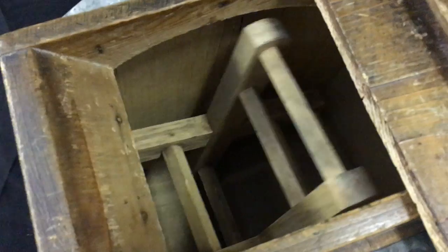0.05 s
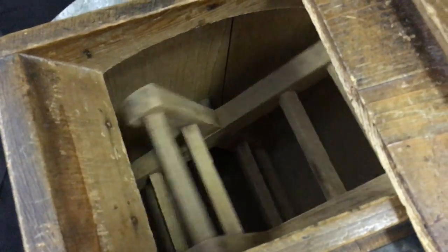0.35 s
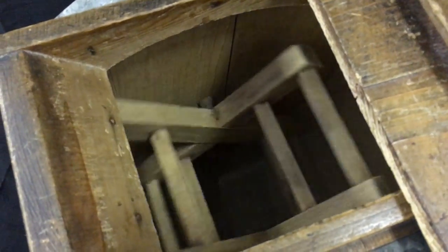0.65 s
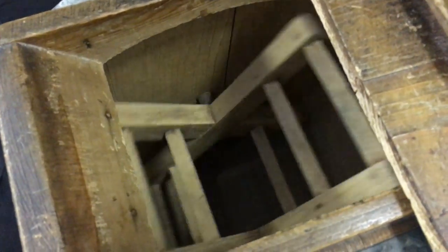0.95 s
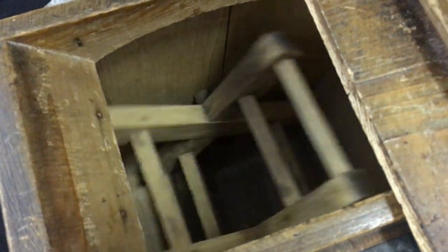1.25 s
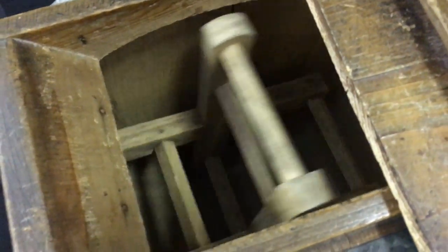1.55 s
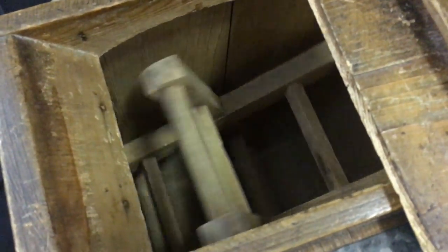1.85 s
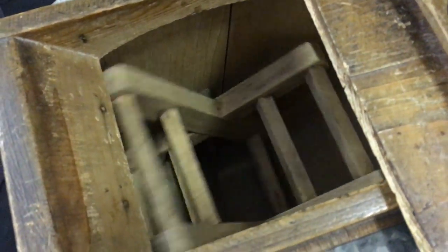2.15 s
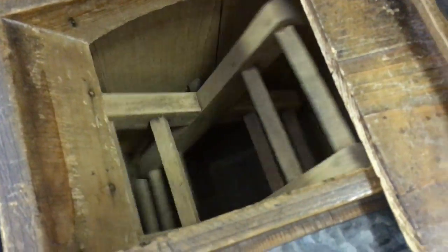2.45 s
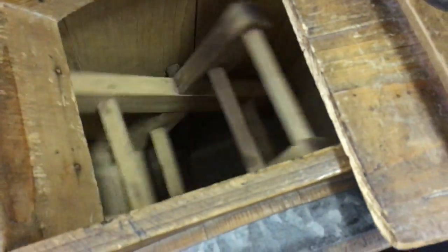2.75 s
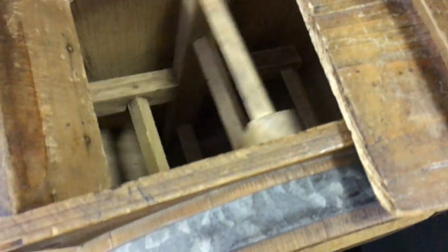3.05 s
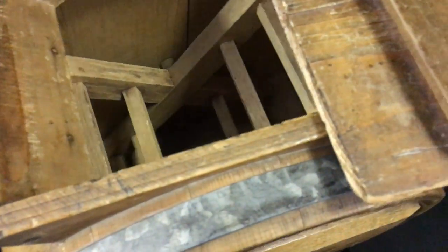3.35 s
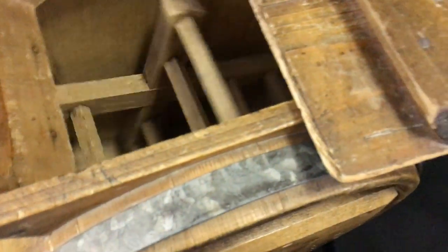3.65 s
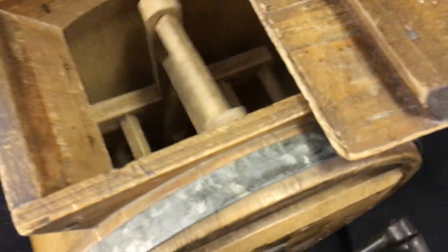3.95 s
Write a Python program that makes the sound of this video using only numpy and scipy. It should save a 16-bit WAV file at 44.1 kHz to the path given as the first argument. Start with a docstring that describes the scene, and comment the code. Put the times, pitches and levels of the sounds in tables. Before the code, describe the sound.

An empty wooden butter churn turns close by in a room, with a steady hollow rumble and faint axle rubbing. A dull knock comes first, then two sharp clacks, scattered lighter knocks and one last clack.

```python
"""The slatted dasher of an empty wooden butter churn, cranked round close by in a room.
Three wooden parts clack once each, two with a rebound. The loose axle knocks dully against the
barrel and rubs in its bearing. The dragging dasher sets the barrel humming; dry wood brushes and
squeaks faintly. A steady hollow rumble and room hiss lie underneath."""
import sys
import numpy as np
from scipy import signal
from scipy.fft import rfft, irfft
from scipy.io import wavfile
from scipy.ndimage import uniform_filter1d

SR = 44100
rng = np.random.default_rng(int(sys.argv[2]) if len(sys.argv) > 2 else 0)


def master(y):
    """Save y as 16-bit WAV."""
    cut = np.clip(np.atleast_2d(y).T, -1, 1)
    pcm = np.round(cut * 32767)  # scale
    wavfile.write(sys.argv[1], SR, pcm.astype(np.int16))


N = 176400
TIME_S = np.arange(N) / SR
STRIKE_S = TIME_S[:SR // 2]
FREQ_HZ = np.arange(N // 2 + 1) * SR / N
TOP_HZ = 15600


def undb(db):
    """Decibels to gain."""
    return 10 ** (np.asarray(db) / 20)


def unit_rms(x):
    """Scale to rms 1."""
    return x / np.sqrt(np.mean(x ** 2))


def decay(t60_s):
    """Exponential decay after a strike, 60 dB in t60_s."""
    return np.exp(-np.minimum(np.log(1000) * STRIKE_S / t60_s, 50))


def swell(middle_s, length_s):
    """Gaussian rise and fall."""
    return np.exp(-2 * ((TIME_S - middle_s) / length_s) ** 2)


def wander(rate_hz):
    """Smooth random drift, rms 1."""
    hold = int(SR / rate_hz)
    steps = rng.standard_normal(4000)[np.arange(N) // hold]
    return unit_rms(uniform_filter1d(uniform_filter1d(steps, hold), hold))


def noise(spectrum):
    """Noise shaped by (Hz, dB) points, 24 dB/octave skirts, rms 1."""
    hz, db = np.array(spectrum, float).T
    f = np.maximum(FREQ_HZ, 1)
    skirts = np.minimum(f / hz[0], 1) ** 4 * np.minimum(hz[-1] / f, 1) ** 4
    shape = undb(np.interp(np.log(f), np.log(hz), db))
    return unit_rms(irfft(rfft(rng.standard_normal(N)) * skirts * shape, N))


def ring(modes, rise_at_1khz_s=0.003):
    """Struck wood: modes build as the blow spreads, low ones slowest, then decay."""
    out = 0
    for hz, db, t60_s in modes:
        rise = 1 - np.exp(-STRIKE_S * np.sqrt(hz / 1000) / rise_at_1khz_s)
        tone = np.sin(2 * np.pi * (hz * STRIKE_S + rng.random()))
        out += undb(db) * rise * tone * decay(t60_s)
    return out


def add(out, start_s, sound):
    """Mix a sound in at start_s."""
    i = int(start_s * SR)
    out[i:i + len(sound)] += sound[:N - i]


# Each row: frequency in Hz, relative density in dB.
AIR_SPECTRUM = [(240, -33), (400, 0), (560, -.5), (1050, -3), (1340, -8.5), (1750, -10.5), (2950, -20),
                (3450, -19), (4840, -29.5), (6700, -33), (7900, -36), (9700, -38), (10400, -43),
                (11200, -38.5), (15500, -43)]


def air(level_db=-52):
    """Smooth room hiss."""
    return undb(level_db) * noise(AIR_SPECTRUM)


# Each row: centre in Hz, width in Hz, relative density in dB.
RUMBLE_RESONANCES = [(43.3, 16, -21), (60.2, 13.8, -0.5), (77.6, 16.4, -6.5), (94, 77, -12),
                     (118.6, 24.6, 0), (141.3, 34, -4), (161.9, 11.6, -3), (185.6, 29.4, -11.5),
                     (229.7, 20.7, -12), (261.5, 15.4, -9), (301, 17, -16), (327.6, 31, -18),
                     (364.6, 39, -14), (391, 42, -23.5)]


def rumble(level_db=-34.5, sway_db=1.5, low_cut_hz=36):
    """Random low shaking through hollow resonances, swaying slightly in level."""
    power = sum(undb(db) ** 2 / (1 + ((FREQ_HZ - hz) / (0.45 * width_hz)) ** 2) ** 2
                for hz, width_hz, db in RUMBLE_RESONANCES)
    shaking = np.exp(2j * np.pi * rng.random(len(FREQ_HZ)))
    low_cut = 1 / np.sqrt(1 + (low_cut_hz / np.maximum(FREQ_HZ, 1)) ** 8)
    hollow = unit_rms(irfft(np.sqrt(power) * low_cut * shaking, N))
    return undb(level_db + sway_db * wander(8.89)) * hollow


# Each row: time in seconds, level in dB.
RUB_LEVELS = [(0, -62), (.21, -59.5), (.29, -58.5), (.5, -55.5), (.62, -58), (.82, -60.5), (1.15, -58),
              (1.38, -54.5), (1.6, -60), (1.82, -56), (2.24, -60), (2.41, -58.5), (2.52, -60.5),
              (2.66, -55.5), (2.8, -55.5), (3.1, -64), (3.45, -62.5), (3.72, -55), (4, -59.5)]
# Each row: frequency in Hz, relative density in dB.
RUB_SPECTRUM = [(400, 7.5), (1000, 5), (1600, -1), (3600, -8.5), (6500, -13.5), (8000, -22.5),
                (9500, -21.5), (10400, -27.5), (11500, -24), (15000, -29)]


def bearing(band_hz=400, band_sway_db=2.4, uneven_db=2.33):
    """Axle friction comes and goes; narrow bands take turns as the contact shifts."""
    friction, rub = rfft(noise(RUB_SPECTRUM)), 0
    for hz in np.arange(band_hz, TOP_HZ, band_hz):
        triangle = np.maximum(1 - abs(FREQ_HZ - hz) / band_hz, 0)
        rub += irfft(friction * triangle, N) * undb(band_sway_db * wander(26))
    level_db = np.interp(TIME_S, *np.array(RUB_LEVELS).T)
    return unit_rms(rub) * undb(level_db + uneven_db * wander(21.87))


# Each row: middle in seconds, length in seconds, level in dB, centre in Hz, half-width in Hz.
BRUSH_STROKES = [(0.37, 0.026, -66, 8000, 5000), (0.49, 0.024, -64, 4000, 3000),
                 (0.488, 0.017, -72, 12800, 1000), (0.63, 0.16, -75, 13600, 1200),
                 (1.795, 0.025, -69, 6000, 4500), (1.933, 0.034, -71, 9800, 2500),
                 (2.063, 0.025, -74, 12300, 2000), (2.05, .17, -80, 14000, 1800),
                 (2.308, 0.012, -68, 6300, 3500), (3.816, 0.36, -80, 14000, 2200),
                 (3.968, 0.02, -59.5, 3520, 1100)]


def brushes(flicker_db=2.0):
    """Wood brushes on wood: faint high swishes, each in its own broad band."""
    hiss, out = rfft(rng.standard_normal(N)), 0
    for middle_s, length_s, db, hz, half_width_hz in BRUSH_STROKES:
        band = irfft(hiss / (1 + ((FREQ_HZ - hz) / half_width_hz) ** 2), N)
        out += undb(db) * swell(middle_s, length_s) * unit_rms(band)
    return out * undb(flicker_db * wander(60))


# Each row: middle in seconds, length in seconds, level in dB, pitch in Hz, glide in Hz per second.
WOOD_SQUEAKS = [(.51, .06, -74, 6700, 0), (1.29, .025, -70, 6750, 0), (1.435, .04, -73, 5950, -5000),
                (3.96, .11, -78, 11200, 5000)]


def squeaks(waver_hz=170, flicker_db=2.0):
    """Dry wood catches briefly: a thin, unsteady whistle."""
    detune_hz, out = waver_hz * wander(540), 0
    for middle_s, length_s, db, hz, glide_hz_per_s in WOOD_SQUEAKS:
        pitch_hz = hz + glide_hz_per_s * np.clip(TIME_S - middle_s, -length_s, length_s) + detune_hz
        whistle = np.sqrt(2) * np.sin(2 * np.pi * np.cumsum(pitch_hz) / SR)
        out += undb(db) * swell(middle_s, length_s) * whistle
    return out * undb(flicker_db * wander(120))


# Shared by drags and knocks. Each row: frequency in Hz, relative level in dB, T60 in seconds.
BARREL_MODES = [(196, -5, .12), (285, -11, .09), (548, -8, .08), (592, -1, .11), (657, 0, .08),
                (748, -8, .06), (1055, -7, .055), (1150, -8, .045), (1437, -10, .055)]
# Each row: middle in seconds, length in seconds, level in dB.
DASHER_DRAGS = [(0.185, 0.18, -50.5), (1.423, 0.027, -51), (1.497, 0.018, -42.5)]


def drags():
    """The dasher drags briefly; friction sets the barrel humming."""
    hum = unit_rms(signal.fftconvolve(rng.standard_normal(N), ring(BARREL_MODES))[:N])
    return hum * sum(undb(db) * swell(middle_s, length_s) for middle_s, length_s, db in DASHER_DRAGS)


# Contact noise. Each row: frequency in Hz, relative density in dB.
KNOCK_SPECTRUM = [(200, -33), (700, 4), (1400, -3.5), (2500, -12.5), (4000, -22), (7000, -42), (15000, -50)]
# Each row: start in seconds, gain in dB, contact time in ms.
AXLE_KNOCKS = [(.195, -15, 6.4), (.845, -35.5, 0.59), (1.073, -17, 3.6), (1.302, -36.5, 0.17),
               (1.309, -32.5, 0.44), (1.370, -39, 0.4), (1.407, -33, 0.53), (1.429, -33, 0.59),
               (1.464, -29.5, 0.47), (1.478, -42.5, 0.25), (1.494, -36.5, 0.41), (1.644, -38, 0.16),
               (2.4425, -41, 0.28), (2.899, -32, 0.46), (2.9435, -28, 0.064), (2.9468, -25, 0.65),
               (2.9650, -27.5, 0.52)]


def knocks(grit_db=-4.5, grit_t60_s=0.078):
    """The loose axle bumps the barrel; longer contact, duller knock."""
    out, grit = np.zeros(N), noise(KNOCK_SPECTRUM)
    for start_s, db, contact_ms in AXLE_KNOCKS:
        blow = ring(BARREL_MODES)
        blow += undb(grit_db) * np.roll(grit, rng.integers(N))[:len(STRIKE_S)] * decay(grit_t60_s)
        cutoff_hz = 1000 / (2 * contact_ms)
        pole = np.exp(-2 * np.pi * cutoff_hz / SR)
        dulled = signal.lfilter([(1 - pole) ** 2], [1, -2 * pole, pole ** 2], blow)
        add(out, start_s, undb(db) * dulled)
    return out


# Modes of each part. Each row: frequency in Hz, relative level in dB, T60 in seconds.
SLAT = [(290, -9, .09), (673, -6, .09), (780, -11, .05), (1115, 0, .055), (1341, -1, .052),
        (1478, -4, .055), (2119, -15, .06), (2529, -9, .04), (2720, -12, .045), (3194, -16, .055),
        (4040, -8, .04), (4500, -16, .05)]
FRAME = [(161, 0, .19), (220, 1, .07), (284, -2, .06), (694, -14, .075), (922, -10, .07), (1034, -13, .05),
         (1608, -16, .045), (1911, -15, .037), (2235, -14, .035)]
PEG = [(580, -12, .05), (720, -11, .04), (2178, 0, .064), (2275, -4, .05), (2625, -1, .04),
       (4382, -18, .058), (5160, -11, .022)]
# Contact noise of each part. Each row: frequency in Hz, relative density in dB.
SLAT_NOISE = [(300, 1), (1200, 7), (2000, -6), (4500, -5.5), (6500, -11.5), (7800, -21), (11500, -24),
              (14000, -46)]
FRAME_NOISE = [(300, 4.5), (1000, 7), (2200, -3), (2800, -2), (6000, -9.5), (8500, -18), (12000, -32),
               (14500, -39)]
PEG_NOISE = [(300, -16), (700, 4), (2600, 13), (3600, -2.5), (6500, -12.5), (9000, -32), (15000, -33)]
# Hits and rebounds. Each row: start in seconds, modes, ring gain in dB, noise spectrum,
# noise gain in dB, noise T60 in seconds.
WOOD_CLACKS = [(1.0065, SLAT, -24, SLAT_NOISE, -25, 0.049), (1.0128, SLAT, -27, SLAT_NOISE, -36, 0.033),
               (1.2583, FRAME, -21.5, FRAME_NOISE, -28.5, 0.053),
               (1.2650, FRAME, -22, FRAME_NOISE, -38, 0.038), (3.6463, PEG, -27.5, PEG_NOISE, -26.5, 0.039)]


def clacks(crack_rise_s=0.00041):
    """Each hard contact gives a crack of noise and rings the struck part."""
    out = np.zeros(N)
    rise = 1 - np.exp(-STRIKE_S / crack_rise_s)
    for start_s, modes, ring_db, spectrum, noise_db, t60_s in WOOD_CLACKS:
        crack = rise * decay(t60_s) * noise(spectrum)[:len(STRIKE_S)]
        add(out, start_s, undb(ring_db) * ring(modes) + undb(noise_db) * crack)
    return out


def scene():
    """Mono sum of all sources."""
    return (rumble() + air() + bearing() + drags() + brushes() + squeaks() + knocks() + clacks())[None]


def record(dry, start_s=0.0825, fade_in_s=0.0025):
    """Brief silence, fast fade-in, steep low-pass."""
    fade_in = np.clip((TIME_S - start_s) / fade_in_s, 0, 1)
    low_pass = signal.ellip(10, .1, 80, TOP_HZ, fs=SR, output="sos")
    return signal.sosfilt(low_pass, dry * fade_in)


dry = scene()
out = record(dry)
master(out)
```